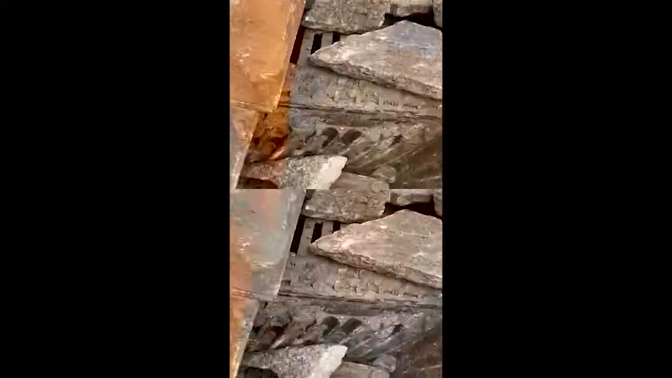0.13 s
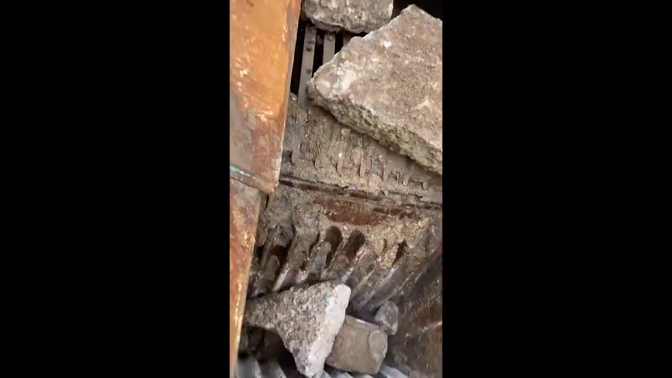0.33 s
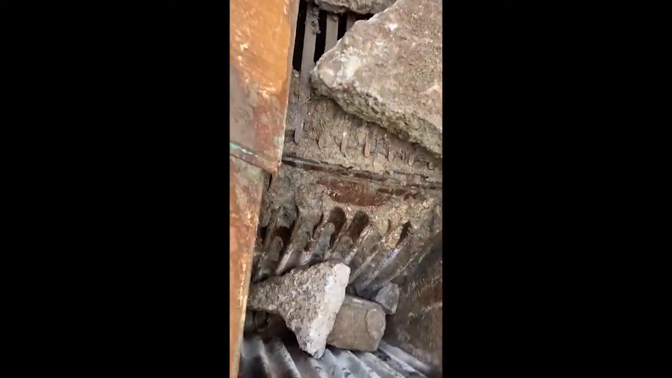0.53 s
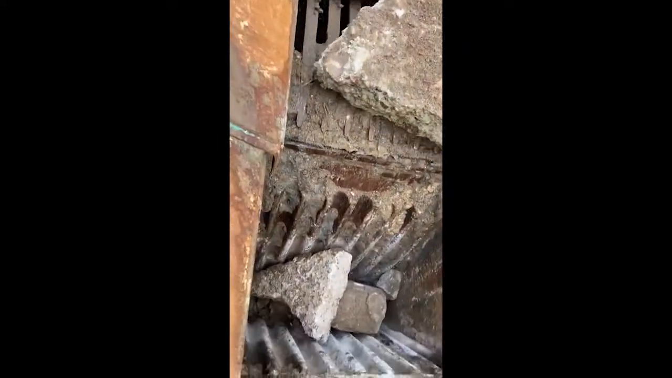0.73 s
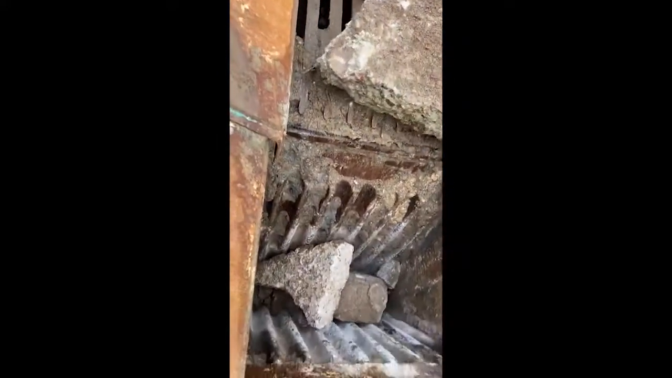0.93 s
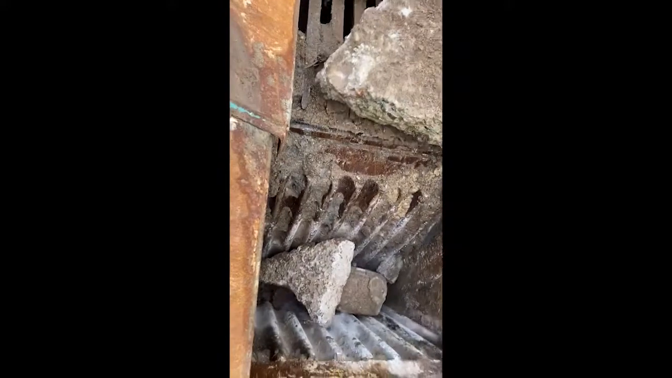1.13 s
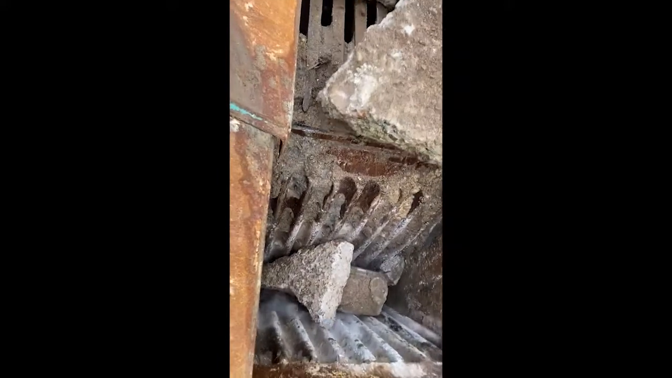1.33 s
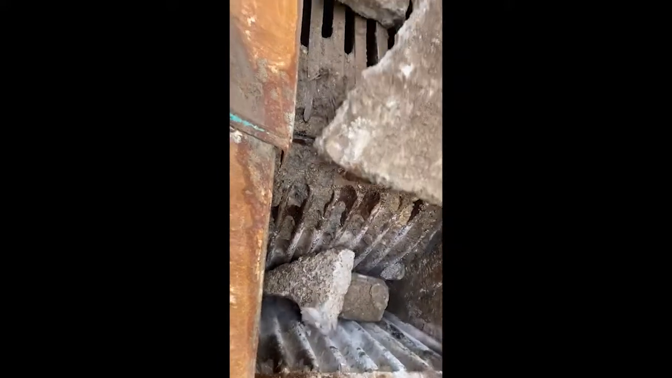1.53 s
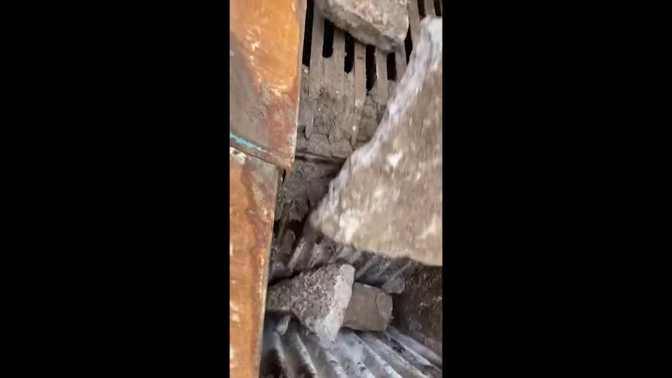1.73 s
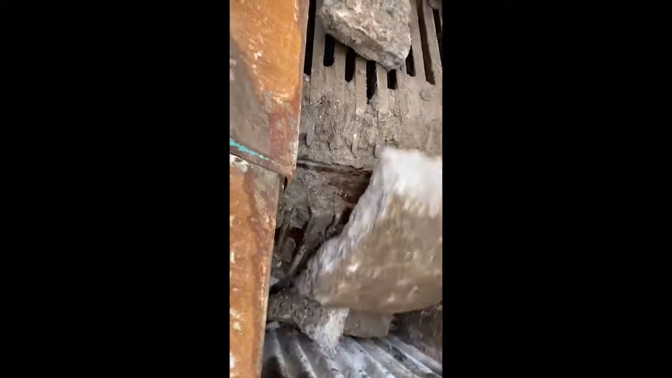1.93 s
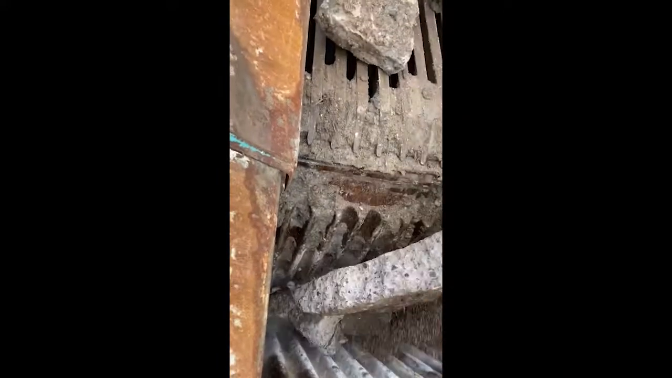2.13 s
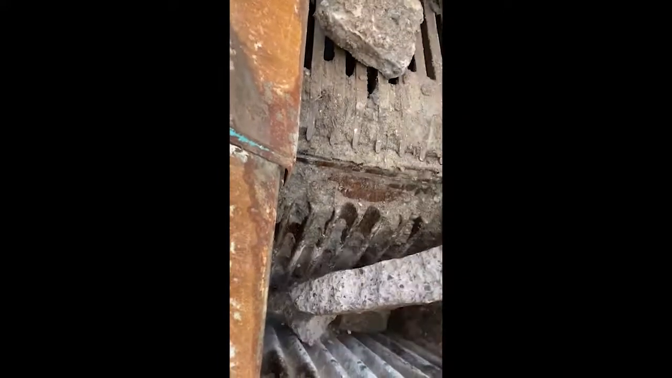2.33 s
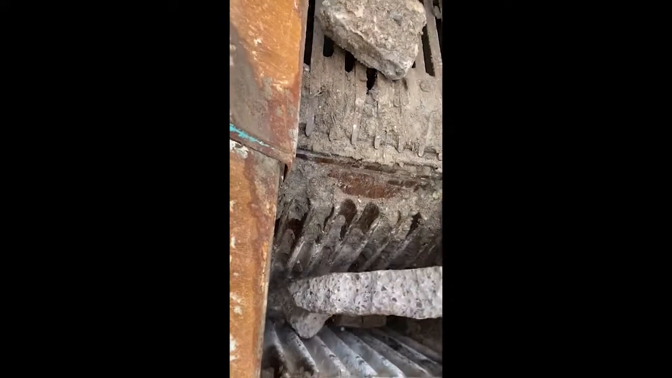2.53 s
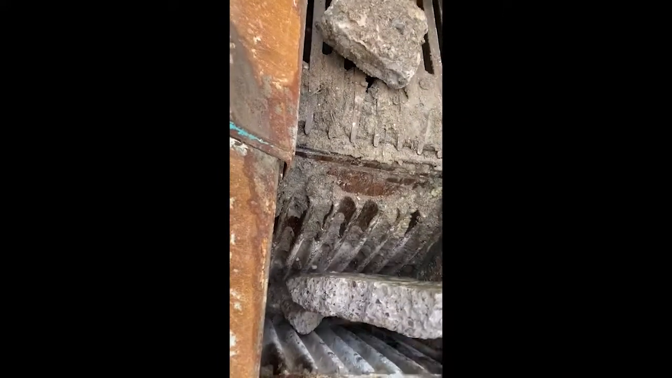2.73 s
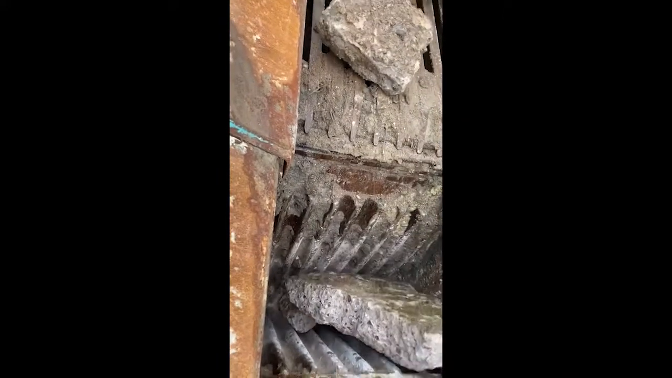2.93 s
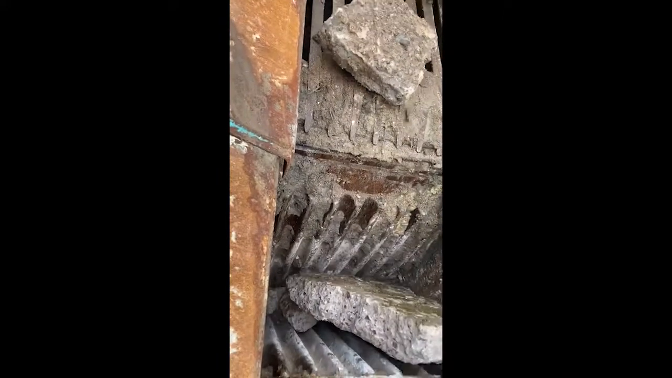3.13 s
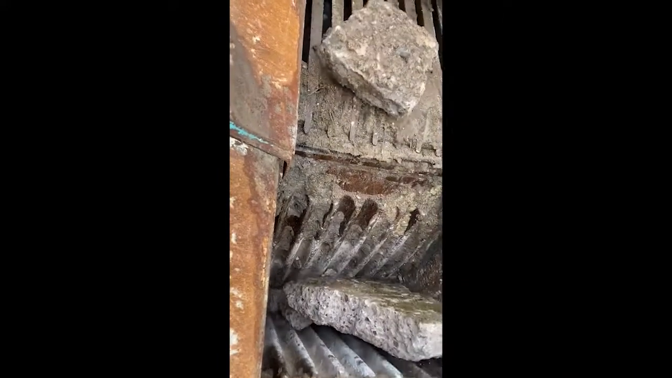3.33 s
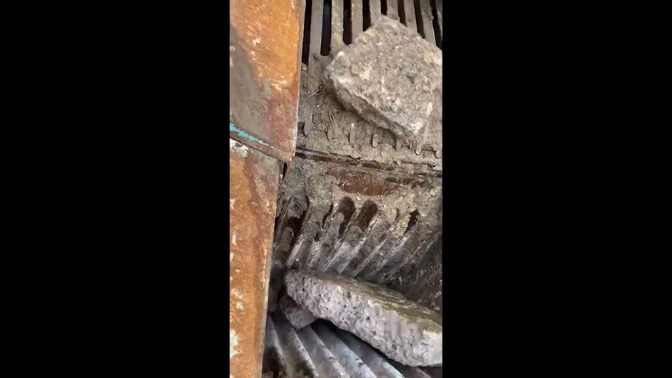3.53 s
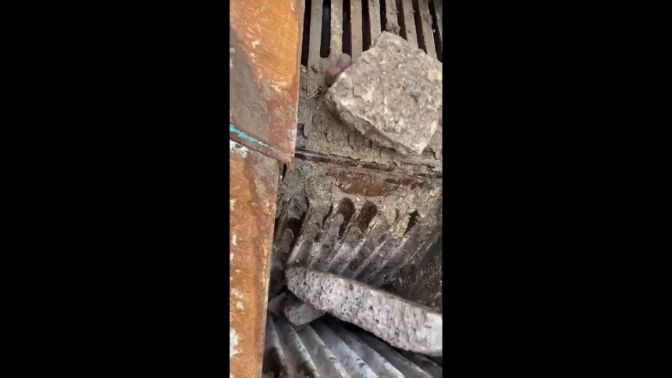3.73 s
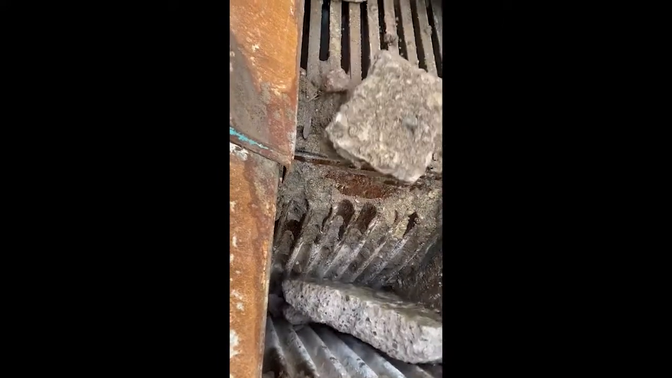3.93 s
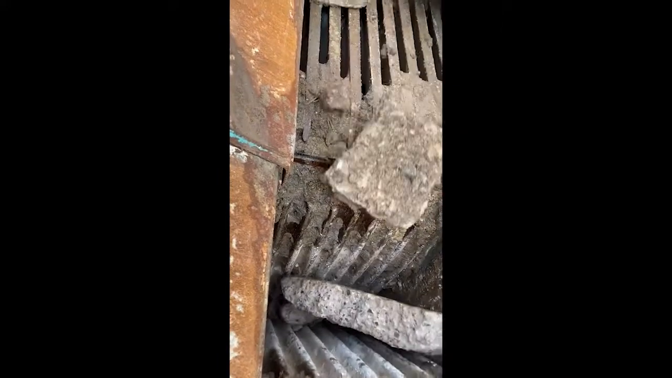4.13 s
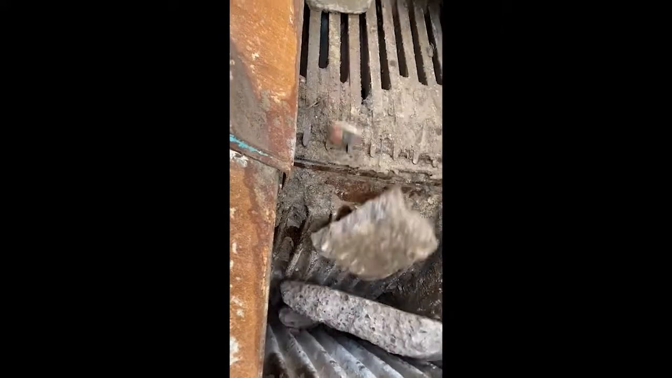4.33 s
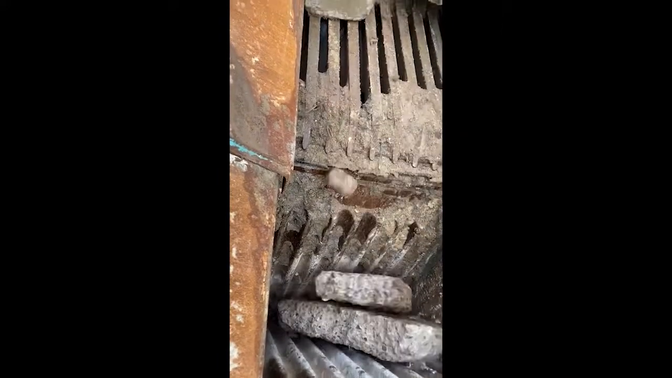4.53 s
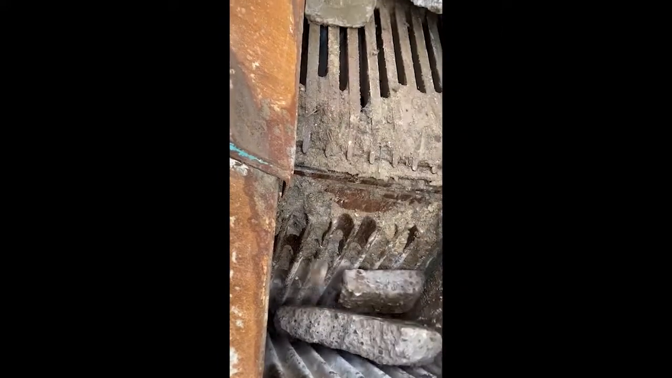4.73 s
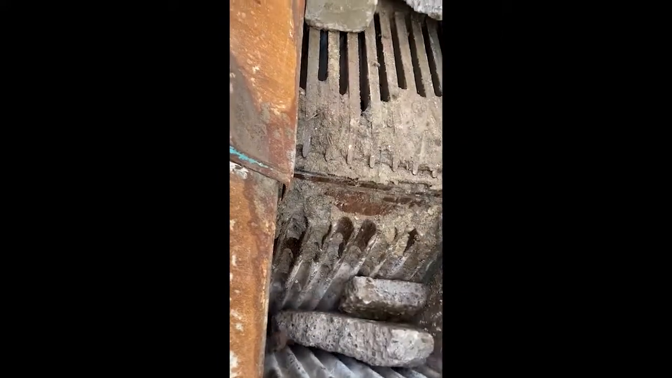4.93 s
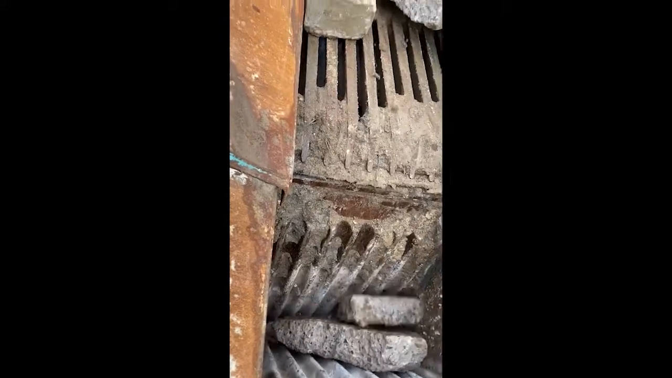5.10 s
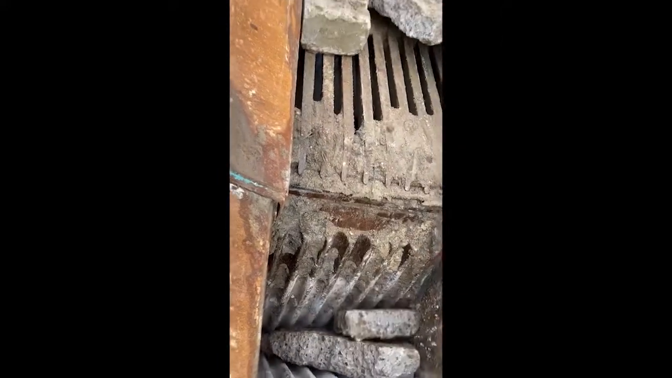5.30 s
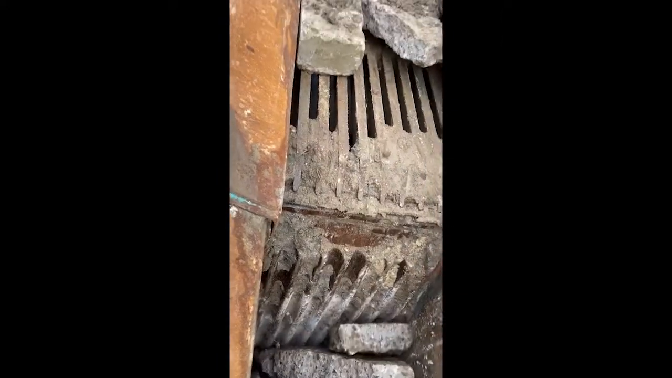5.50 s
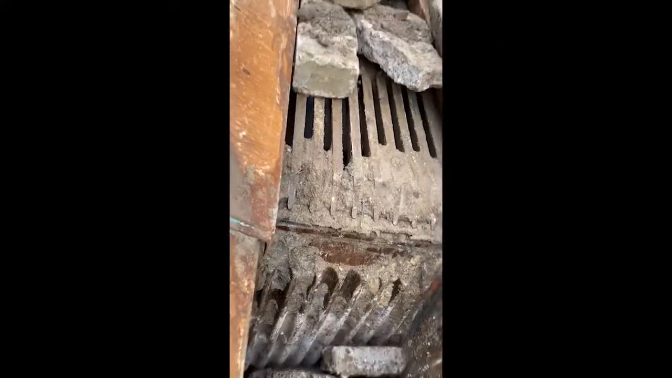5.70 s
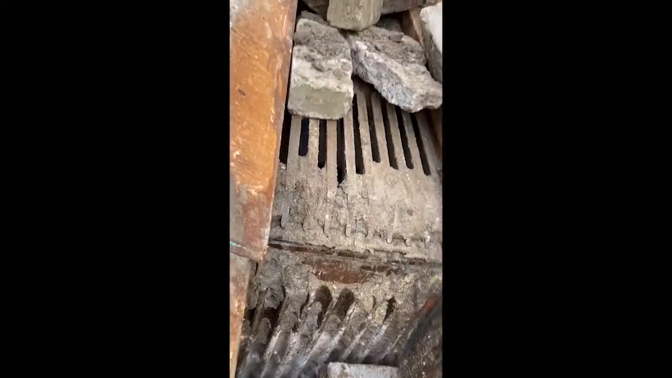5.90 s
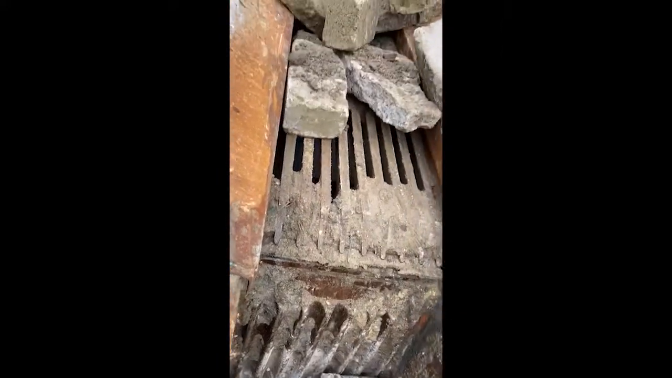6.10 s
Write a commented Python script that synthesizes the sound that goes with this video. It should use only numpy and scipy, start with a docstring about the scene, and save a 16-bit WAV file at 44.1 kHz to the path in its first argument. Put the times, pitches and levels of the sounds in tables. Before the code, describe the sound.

Heard from just above a steel hopper, a jaw crusher hums low and rumbles under load. One dry clack opens, then concrete blocks knock hollowly against jaw and plates in a rapid churn of five to six squeezes a second. Each squeeze crunches, with grit, dust and clinking chips; sharp snaps and short stony rings scatter through. The heaviest knocks gather around four seconds, then it eases briefly and carries on. Close, dry stereo microphone.

```python
"""Just above the steel hopper of a jaw crusher, brick and concrete are chewed 5.5 times a second.
The drive hums on two tones, the loaded frame rumbles as filtered noise and loose rubble shuffles in grains.
One dry clack opens the scene. Then blocks knock as damped resonances that also ring the steel plates.
Each squeeze grinds out a burst of tiny fractures: coarse crunch, grit, dust and clinking chips.
Hard corners ring as short sine pairs, and snapping pieces spray bright grains and ring at their own pitch."""
import sys
import numpy as np
from scipy import signal
from scipy.fft import rfft, irfft, next_fast_len
from scipy.io import wavfile
from scipy.ndimage import uniform_filter1d, minimum_filter1d

SR = 44100
rng = np.random.default_rng(int(sys.argv[2]) if len(sys.argv) > 2 else 0)


def dump_mix(stems):
    """Bounce the given channels to the path in sys.argv[1] as a 16-bit WAV at rate SR."""
    frames = np.atleast_2d(stems).T  # one column per channel
    limited = np.clip(frames, -1, 1)  # hard clip at full scale
    pcm = np.round(limited * 32767).astype(np.int16)
    wavfile.write(sys.argv[1], SR, pcm)


N = 276066
TIME = np.arange(N) / SR   # s

# the jaw swings at a steady rate; times in a stroke are counted from its hardest squeeze
STROKE_S, FIRST_SQUEEZE_S, SQUEEZE_HALF_S = 0.18252, 0.1765, 0.03
STROKE_SPREAD_DB = 1.14   # chance differences in strength between strokes
PITCH_SPREAD_OCTAVES = 0.27
# bands in which coloured noise is scaled to rms 1: (low [Hz], high [Hz])
RUMBLE_BAND, CRUNCH_BAND, GRIT_BAND = (60, 250), (900, 2500), (3000, 7500)


def from_db(db):
    """Turn decibels into an amplitude factor."""
    return 10 ** (np.asarray(db) / 20)


def rms_one(x):
    """Scale a signal to an rms of 1."""
    return x / np.sqrt(np.mean(x ** 2) + 1e-20)


def at_hz(points, hz):
    """Read a table along a log-frequency axis."""
    points = np.array(points)
    return np.interp(np.log(hz + 1), np.log(points[:, 0] + 1), points[:, 1])


def along(curve, s):
    """Read every column of a curve at the times s."""
    times, *columns = np.transpose(curve)
    return [np.interp(s, times, column) for column in columns]


def drift(rate):
    """Slow random motion of rms 1 with about `rate` turns a second."""
    hz = np.arange(N // 2 + 1) * SR / N
    smooth = np.exp(-(2 * hz / rate) ** 2)
    return rms_one(irfft(rfft(rng.standard_normal(N)) * smooth, N))


def coloured(x, spectrum, band):
    """Give two streams a spectrum, scaled to rms 1 inside the band."""
    size = next_fast_len(N + 4096)
    hz = np.arange(size // 2 + 1) * SR / size
    bins = rfft(x, size) * from_db(at_hz(spectrum, hz))
    inside = (hz > band[0]) & (hz < band[1])
    power = 2 * np.mean(np.sum(abs(bins[:, inside]) ** 2, axis=1)) / (size * N)
    return irfft(bins, size)[:, :N] / np.sqrt(power)


def grains(per_s, spread_db):
    """Two streams of tiny fractures: common moments, uneven sizes."""
    born = rng.random(N) < per_s / SR
    size = from_db(spread_db * np.minimum(rng.exponential(1, N), 4))
    return born * size * rng.standard_normal((2, N))


def resonate(x, hz, width_hz):
    """One resonance with gain 1 on its top."""
    r = np.exp(-np.pi * width_hz / SR)
    feed = np.array([1, 0, -1]) * (1 - r * r) / 2
    feedback = [1, -2 * r * np.cos(2 * np.pi * hz / SR), r * r]
    return signal.lfilter(feed, feedback, x + 1e-18)   # the tiny offset keeps the filter fast in silence


def body(x, modes):
    """Resonances side by side, as in a solid object."""
    return sum(from_db(db) * resonate(x, hz, width) for hz, width, db in modes)


def add(out, s, sound):
    """Mix a short sound in at time s."""
    start = max(round(s * SR), 0)
    out[:, start:start + sound.shape[1]] += sound[:, :N - start]


def chips(level_db, per_s, low_hz, high_hz, spread_db=2.0, sharpness=30, count=30):
    """Fragments of many sizes clink briefly, each at its own pitch; small, high ones are fainter."""
    clicks, dealt = grains(per_s, spread_db), rng.integers(0, count, N)
    out = 0
    for k, hz in enumerate(np.geomspace(low_hz, high_hz, count)):
        out = out + resonate(clicks * (dealt == k), hz, hz / sharpness) / hz ** 2
    return from_db(level_db) * rms_one(out)


def squeezes():
    """The moments [s] at which the jaw squeezes hardest."""
    return np.arange(FIRST_SQUEEZE_S, N / SR, STROKE_S)


# load on the machine, relative levels: (time [s], frame rumble [dB], shuffle of loose rubble [dB])
LOAD_CURVE = [(0.0, -24, -42), (0.2, -27.5, -47.5), (0.7, -27, -45), (1.1, -26, -47.5), (1.451, -25, -42.5),
              (1.98, -31, -46.5), (3.12, -28.5, -48), (3.37, -28.5, -40.5), (3.62, -29.5, -47.5),
              (4.05, -29.5, -45), (4.45, -29, -49.5), (4.6, -38.5, -57), (4.84, -34, -52),
              (4.98, -33.5, -46.5), (5.12, -28, -50.5), (5.33, -30, -41.5), (5.6, -31, -45.5),
              (6.25, -31, -48)]
DRIVE_HZ = 49.22


def drive(db, second_db, wander, flutter_db, load_share):
    """The drive hums on its turning rate and the octave, which swells unevenly; both follow the load."""
    frame_db = along(LOAD_CURVE, TIME)[0]
    strain_db = load_share * (frame_db - np.mean(np.array(LOAD_CURVE)[:, 1]))
    phase = 2 * np.pi * np.cumsum(DRIVE_HZ * (1 + wander * drift(5.04))) / SR
    low = from_db(db) * np.sin(phase)
    octave = from_db(second_db + flutter_db * drift(16.0)) * np.sin(2 * phase)
    return from_db(strain_db) * (low + octave)


# spectrum of the frame's rumble: (frequency [Hz], relative level [dB per Hz])
RUMBLE_SPECTRUM = [(25, -28.5), (42, -18), (58, -1), (80, 0), (115, 3), (170, 1.5), (230, -3.5),
                   (380, -5.5), (600, -15), (1100, -53)]
# spectrum of the loose rubble: (frequency [Hz], relative level [dB per Hz])
SHUFFLE_SPECTRUM = [(40, -30.5), (200, -5.5), (450, 13), (800, 6.5), (1200, 0.5), (2000, -7), (3000, -10.5),
                    (5000, -16), (8000, -22), (13000, -28.5), (16000, -36)]


def machine(rumble_db, shuffle_db, jostle_db, slack_db, slack_lead_s):
    """The loaded frame rumbles while loose rubble shuffles on the feeder; both slacken while the jaw is open."""
    frame_db, loose_db = along(LOAD_CURVE, TIME)
    swing = np.cos(2 * np.pi * (TIME - FIRST_SQUEEZE_S + slack_lead_s) / STROKE_S)
    open_db = -slack_db * swing
    rumble = coloured(rng.standard_normal((2, N)), RUMBLE_SPECTRUM, RUMBLE_BAND)
    rumble = from_db(frame_db + open_db + rumble_db) * rumble
    loose = from_db(loose_db + open_db + shuffle_db + jostle_db * drift(60))
    clatter = chips(level_db=-4.5, per_s=90, low_hz=768, high_hz=3890)
    shuffle = coloured(grains(per_s=7600, spread_db=-1.0), SHUFFLE_SPECTRUM, CRUNCH_BAND)
    return rumble + loose * (clatter + shuffle)


# resonances of the single sharp clack: (frequency [Hz], relative level [dB])
CLACK_TONES = [(520, -10.5), (820, -17), (1160, -11), (1700, -15), (2200, -19.5), (2780, -17), (3400, -23),
               (4250, -16), (6200, -25)]
# resonances of the scrape before it: (frequency [Hz], width [Hz], relative level [dB])
SCRAPE_RESONANCES = [(2760, 1240, 5), (5800, 2000, -14)]
# moment of the blow, length of the scrape before it, time after the blow at which the sound breaks off
CLACK_AT_S, SCRAPE_S, CLACK_RING_S = 0.0393, 0.0133, 0.01185


def clack(rise_cycles, steepness, scrape_db, crush_db):
    """A short scrape, then one hard blow: high modes speak first, low ones swell later, and the sound breaks
    off abruptly."""
    t = TIME[:SR // 20] - SCRAPE_S
    noise = rms_one(body(rng.standard_normal((2, len(t))), SCRAPE_RESONANCES))
    sound = from_db(np.where(t < 0, scrape_db, crush_db)) * noise
    for hz, db in CLACK_TONES:
        swell = np.maximum(t, 0) * hz / rise_cycles
        swell = (swell * np.exp(1 - swell)) ** steepness
        sound[0] += from_db(db) * swell * np.sin(2 * np.pi * (hz * t + rng.random()))
    out = np.zeros((2, N))
    stop = np.clip((CLACK_RING_S - t) / .0005, 0, 1)
    add(out, CLACK_AT_S - SCRAPE_S, sound * stop)
    return out


def small_pieces(share, over_db, scatter_s, hz):
    """Some strokes catch a small piece, louder when more rubble is loose: rows of (s, dB, Hz)."""
    s = squeezes()
    late, high = rng.standard_normal((len(s), 2)).T
    caught = rng.random(len(s)) < share
    s = np.clip(s + scatter_s * late, 0, TIME[-1])
    db = along(LOAD_CURVE, s)[1] + over_db
    pitch_hz = hz * 2 ** (PITCH_SPREAD_OCTAVES * high)
    return [tuple(row) for row in np.transpose([s, db, pitch_hz])[caught]]


# how hard the jaw works as the chamber fills and empties, relative levels; bites and strokes both read it:
# (time [s], bite [dB], crunch [dB], grit [dB], delay until the stone gives [s], negative is early)
EFFORT_CURVE = [(0.18, -26.5, -38, -50.5, 0.0066), (0.55, -27.5, -37.5, -52, -0.01),
                (1.3, -26, -37.5, -52, -0.0025), (1.8, -32, -48.5, -53, 0.028),
                (2.2, -34.5, -37, -59, -0.015), (2.55, -34, -37.5, -51.5, -0.015),
                (2.73, -35, -34, -47, 0.0031), (2.92, -25, -41.5, -57.5, -0.011),
                (3.27, -29, -37.5, -55, -0.0079), (3.46, -32, -35.5, -51, 0.015),
                (3.64, -29, -36, -52.5, -0.0047), (3.83, -34, -41, -58, -0.0038),
                (4.1, -23, -35, -52.5, -0.0094), (4.37, -16.5, -38.5, -54, -0.0089),
                (4.56, -26.5, -47, -64, -0.029), (5.1, -27, -38, -56.5, 0.0042),
                (5.3, -25, -41, -50, 0.004), (5.48, -32, -42, -55, 0.019),
                (5.66, -30.5, -39, -49.5, 0.0005), (5.84, -30, -37, -53, 0.0048),
                (6.02, -31, -38.5, -59, -0.011), (6.2, -30, -37, -52, 0.0025)]
# big blocks dropping or slipping against jaw and hopper:
# (time [s], relative level [dB], pitch [Hz], length of contact [s])
BLOCK_KNOCKS = [(0.13, -22, 487, 0.0054), (0.485, -24, 464, 0.0034), (0.672, -18.5, 472, 0.011),
                (0.866, -23.5, 470, 0.006), (0.875, -21, 404, 0.008), (1.061, -16.5, 478, 0.0048),
                (1.18, -26, 432, 0.0035), (1.227, -25, 277, 0.006), (1.245, -21, 375, 0.011),
                (1.274, -17, 500, 0.0046), (1.366, -26.5, 410, 0.013), (1.414, -21, 410, 0.018),
                (1.608, -19.5, 446, 0.0042), (1.68, -25.5, 236, 0.0065), (1.818, -20.5, 476, 0.0048),
                (2.181, -22.5, 439, 0.016), (2.72, -29.5, 330, 0.01), (2.863, -30, 555, 0.006),
                (2.884, -24, 373, 0.0065), (3.057, -21, 423, 0.0085), (3.253, -25, 452, 0.01),
                (3.3, -25, 294, 0.0079), (3.344, -27.5, 428, 0.009), (3.461, -24, 420, 0.017),
                (3.615, -21, 417, 0.0074), (3.917, -27.5, 460, 0.0055), (3.975, -20, 507, 0.0095),
                (4.023, -21, 290, 0.014), (4.168, -18, 445, 0.008), (4.339, -22.5, 559, 0.026),
                (4.521, -23.5, 437, 0.013), (4.541, -17.5, 496, 0.011), (4.74, -25, 380, 0.018),
                (4.884, -24.5, 370, 0.009), (5.07, -24.5, 473, 0.0088), (5.242, -28.5, 589, 0.011),
                (5.294, -27, 304, 0.0063), (5.992, -25.5, 465, 0.007), (6.159, -24.5, 505, 0.007),
                (6.194, -22, 480, 0.011)]
BITE_LEAD_S, BITE_JITTER_S, BITE_HZ, BITE_CONTACT_S = 0.04, 0.00193, 522, 0.013


def bites():
    """A knock as the jaw meets the stone, unless a big block strikes within 0.02 s: (s, dB, Hz, contact s)."""
    s = squeezes()
    early, strong, high = rng.standard_normal((len(s), 3)).T
    db = along(EFFORT_CURVE, s)[0] + STROKE_SPREAD_DB * strong
    pitch_hz = BITE_HZ * 2 ** (PITCH_SPREAD_OCTAVES * high / 2)
    rows = zip(s - BITE_LEAD_S + BITE_JITTER_S * early, db, pitch_hz)
    blocks = np.array(BLOCK_KNOCKS)[:, 0]
    return [(*bite, BITE_CONTACT_S) for bite in rows if np.min(abs(blocks - bite[0])) > .02]


# the frame jolts as the load shifts: (time [s], relative level [dB])
FRAME_JOLTS = [(0.906, -25), (1.289, -19.5), (1.498, -20), (1.54, -22), (1.85, -23.5), (2.034, -17),
               (2.19, -22.5), (2.7, -18.5), (2.754, -19), (3.1, -24), (3.253, -17), (3.846, -21),
               (5.102, -26), (5.477, -25.5), (6.226, -26)]
THUMP_DELAY_S, THUMP_OVER_RUMBLE_DB, THUMP_HZ, THUMP_CONTACT_S = 0.0118, -2, 120, 0.017


def thumps():
    """A low thump of the frame after every squeeze, and the heavy ones: (s, dB, Hz, contact s)."""
    s = squeezes() + THUMP_DELAY_S
    light = list(zip(s, along(LOAD_CURVE, s)[0] + THUMP_OVER_RUMBLE_DB))
    return [(*thump, THUMP_HZ, THUMP_CONTACT_S) for thump in light + FRAME_JOLTS]


# how a struck block rings: (multiple of its pitch, relative level [dB])
BLOCK_TONES = [(1.1, -3.5), (2.05, -8.5), (3.25, -19)]


def strike(hz, ring_s, tick_db, tick_hz, tick_s):
    """The first touch of a block: a hard tick and a short hollow ring; heavy, low blows land more softly."""
    t = TIME[:SR // 12]
    noise = resonate(rng.standard_normal((2, len(t))), tick_hz, tick_hz)
    noise = resonate(noise, tick_hz, 2 * tick_hz)
    tick = from_db(tick_db) * np.exp(-t / tick_s) * rms_one(noise)
    tones = sum(from_db(db) * np.sin(2 * np.pi * ratio * hz * t) for ratio, db in BLOCK_TONES)
    hollow = tones * np.exp(-t / ring_s)
    return (hz / BITE_HZ) ** 2 * (tick + np.outer([1, rng.normal(0, .5)], hollow))


# ring of the steel plates: (frequency [Hz], width [Hz], relative level [dB])
PLATE_RESONANCES = [(296.6, 42, 11.5), (386, 38, 7.5), (445.7, 6.6, -0.5), (549, 18, 2.5), (960, 11, -2)]


def knocks(level_db, rise_s, ring_cycles, relative_width, dull_hz, plate_db, crumble):
    """A block strikes, grinds on steel for a moment, thuds in a broad resonance and rings the plates."""
    out, fronts, t = np.zeros((2, N)), np.zeros((2, N)), TIME[:SR // 8]
    small = small_pieces(share=0.25, over_db=9.9, scatter_s=0.04, hz=410)
    small = [(*piece, BITE_CONTACT_S) for piece in small]
    for s, db, hz, length_s in bites() + thumps() + BLOCK_KNOCKS + small:
        width_hz = relative_width * hz
        thud = resonate(rng.standard_normal((2, 2 * len(t))), hz, width_hz)
        thud = resonate(thud, hz, 2 * width_hz)
        thud = rms_one(thud[:, len(t):])   # skip the part where the resonance builds up
        thud = thud / np.sqrt(1 + crumble * abs(signal.hilbert(thud)) ** 2)   # stone gives way under force peaks
        fade = np.exp(-np.maximum(t - 0.62 * length_s, 0) / (0.0064 + ring_cycles / hz))
        contact = (1 - np.exp(-t / rise_s)) * fade
        thud = contact * thud
        # the blow sets the energy
        thud = thud * np.sqrt(np.sum(contact ** 2) / np.sum(thud ** 2, axis=1, keepdims=True))
        add(out, s, from_db(db + level_db) * thud)
        front = strike(hz, ring_s=0.0091, tick_db=-13, tick_hz=1400, tick_s=0.0043)
        add(fronts, s, from_db(db) * front)
    out = signal.sosfilt(signal.butter(3, dull_hz, fs=SR, output="sos"), out)
    return fronts + out + from_db(plate_db) * body(out, PLATE_RESONANCES)


def squeeze(t, half_s, rise_power=3.8, fall_power=2.5):
    """Crushing starts quickly as the jaw grips and ebbs as it opens."""
    return np.exp(-.5 * abs(t / half_s) ** np.where(t < 0, rise_power, fall_power))


def slips(per_s, depth, decay_s):
    """Stone gives way in jerks: each rises at once and dies fast; a gain of rms 1."""
    jerks = (rng.random(N) < per_s / SR) * rng.uniform(0.38, 1, N)
    power = signal.lfilter([1], [1, -np.exp(-2 / (decay_s * SR))], jerks + 1e-18)
    return rms_one(np.sqrt(1 + abs(depth) * power))


# spectrum of the coarse crunch: (frequency [Hz], relative level [dB per Hz])
CRUNCH_SPECTRUM = [(40, -24), (120, 3), (250, 11), (450, 11.5), (750, 4), (1200, 0.5), (2000, -12.5),
                   (3000, -20.5), (5000, -32), (9000, -32.5)]
# spectrum of the grit: (frequency [Hz], relative level [dB per Hz])
GRIT_SPECTRUM = [(1000, 3.5), (2500, 9), (4000, -10.5), (6000, 6.5), (9000, -10), (13000, -12),
                 (16000, -21)]
# spectrum of the finest dust: (frequency [Hz], relative level [dB per Hz])
DUST_SPECTRUM = [(2000, -12), (4000, 6), (6000, 5.5), (9000, -4.5), (13000, 3.5), (16000, -11)]


def strokes(crunch_db, grit_db, dust_db, crunch_lead_s, slip_db, jerk_depth, jerk_s):
    """Each squeeze crushes stone in small slips: coarse crunch first, grit and fine dust just after."""
    coarse, fine = np.zeros((2, N))
    for s in squeezes():
        _, coarse_db, fine_db, delay_s = along(EFFORT_CURVE, s)
        luck_db = STROKE_SPREAD_DB * rng.standard_normal()
        near = slice(max(int((s - .2) * SR), 0), int((s + .2) * SR))
        t = TIME[near] - s - delay_s
        coarse[near] += from_db(coarse_db + luck_db) * squeeze(t + crunch_lead_s, SQUEEZE_HALF_S)
        fine[near] += from_db(fine_db + luck_db) * squeeze(t, SQUEEZE_HALF_S)
    crunch = coloured(grains(per_s=2500, spread_db=1.5), CRUNCH_SPECTRUM, CRUNCH_BAND)
    crunch = from_db(crunch_db) * slips(70, jerk_depth, jerk_s) * crunch
    grit = coloured(grains(per_s=8000, spread_db=0.0), GRIT_SPECTRUM, GRIT_BAND)
    grit = from_db(grit_db) * slips(68, jerk_depth, jerk_s) * grit
    dust = coloured(grains(per_s=4400, spread_db=1.0), DUST_SPECTRUM, GRIT_BAND)
    dust = from_db(dust_db) * slips(60, jerk_depth, jerk_s) * dust
    fragments = chips(level_db=-1.5, per_s=100, low_hz=699.5, high_hz=3640)
    splinters = chips(level_db=-7.5, per_s=100, low_hz=2370, high_hz=7460)
    crushed = coarse * (crunch + fragments) + fine * (grit + dust + splinters)
    return from_db(slip_db * drift(110)) * crushed


# hard corners of stone striking with a short ring: (time [s], relative level [dB], pitch [Hz])
CORNER_RINGS = [(0.188, -35.5, 1785), (0.323, -36, 1570), (0.545, -30.5, 1593), (0.723, -37, 1400),
                (1.063, -35, 1785), (1.277, -41, 1580), (1.5, -41.5, 1598), (2.04, -35, 2100),
                (2.182, -27, 1204), (2.355, -31.5, 825), (2.517, -32.5, 1190), (2.696, -37, 2060),
                (2.893, -21, 767), (3.063, -18.5, 775), (3.404, -32.5, 864), (3.639, -34, 1190),
                (4.153, -28.5, 1165), (4.158, -25, 766), (4.34, -30, 1040), (4.549, -24.5, 1004),
                (4.698, -22.5, 747), (5.244, -29, 906)]


def rings(level_db, decay_s, overtone_db, overtone_ratio):
    """Each corner excites a close pair of modes and an overtone that dies sooner."""
    out, t = np.zeros((2, N)), TIME[:SR // 6]
    small = small_pieces(share=0.4, over_db=8.2, scatter_s=0.024, hz=973)
    for s, db, hz in CORNER_RINGS + small:
        partner_hz = hz * rng.uniform(.9, .95)
        main = np.sin(2 * np.pi * hz * t) * np.exp(-t / decay_s)
        partner = .5 * np.sin(2 * np.pi * partner_hz * t) * np.exp(-2 * t / decay_s)
        overtone = np.sin(2 * np.pi * overtone_ratio * hz * t) * np.exp(-2 * t / decay_s)
        ring = main + partner + from_db(overtone_db) * overtone
        add(out, s, from_db(db + level_db) * np.outer([1, rng.normal(0, .5)], ring))
    return out


# large pieces snapping: (time [s], relative level [dB], pitch of the piece [Hz])
BIG_SNAPS = [(0.545, -46.5, 3980), (0.965, -52.5, 5560), (0.988, -52, 2920), (1.128, -48.5, 4740),
             (1.498, -47, 4000), (1.83, -44, 2700), (2.039, -39, 5880), (2.163, -45.5, 5960),
             (2.181, -39, 5500), (2.536, -45, 5500), (2.695, -44, 3500), (2.778, -51, 5500),
             (2.799, -50.5, 2450), (3.145, -51.5, 6140), (3.642, -50.5, 3470), (4.155, -49.5, 2380),
             (4.531, -46.5, 3740), (5.298, -48, 3640), (5.652, -43, 2800), (5.673, -48, 5870),
             (5.854, -39.5, 3230), (6.205, -51, 6700)]
# how a snapped piece rings: (multiple of its pitch, relative level [dB])
PIECE_TONES = [(.59, -9), (1, 3), (1.18, -8), (1.88, -1.5)]
# spectrum of the spray of fractures: (frequency [Hz], relative level [dB per Hz])
SNAP_SPECTRUM = [(400, 11.5), (1200, 16.5), (2500, 6.5), (4000, 1), (6000, 2.5), (9000, 0.5), (13000, 0),
                 (16000, -11)]


def cracks(level_db, decay_s, ring_db, sharpness):
    """A snap is a bright, dying spray of fractures that sets the piece ringing at its own pitch."""
    force, ringing, t = np.zeros(N), np.zeros((2, N)), TIME[:SR // 12]
    small = small_pieces(share=0.37, over_db=-10, scatter_s=0.029, hz=4080)
    for s, db, hz in BIG_SNAPS + small:
        force[round(s * SR)] += from_db(db + level_db)
        burst = rng.standard_normal((2, len(t))) * np.exp(-2 * t / decay_s)
        for ratio, mode_db in PIECE_TONES:
            mode = resonate(burst, ratio * hz, ratio * hz / sharpness)
            mode = mode / np.sqrt(np.sum(mode ** 2, axis=1, keepdims=True) / (decay_s * SR / 2))
            add(ringing, s, from_db(db + ring_db + mode_db) * mode)
    spray = signal.lfilter([1], [1, -np.exp(-1 / (decay_s * SR))], force + 1e-18)
    return ringing + spray * coloured(grains(per_s=7000, spread_db=3.5), SNAP_SPECTRUM, GRIT_BAND)


# likeness of the two microphone ports: (frequency [Hz], left-right correlation [0 to 1])
PORT_LIKENESS = [(100, 1), (450, 0.98), (850, 0.61), (1900, 1), (4400, 0.36), (7000, 0.66), (8800, 1),
                 (11000, 1), (13000, 1), (15000, .62)]
# level difference of the ports: (frequency [Hz], left minus right [dB])
PORT_TILT = [(60, -0.5), (200, 2), (400, 3), (700, 4.5), (1290, -0.5), (2400, 0), (4400, -1.5),
             (7500, -0.5)]
# phase difference of the ports: (frequency [Hz], lead of the left [radians])
PORT_LEAD = [(280, 0.02), (450, 0.04), (750, -0.65), (1300, 0.5), (2900, 1.0), (4000, 0.87), (5000, 2.03),
             (6000, 2.52), (10000, 3), (15500, 5)]


def ports(field):
    """Two close ports share the direct sound; hopper reflections reach them differently."""
    size = next_fast_len(N + 4096)
    hz = np.arange(size // 2 + 1) * SR / size
    shared, apart = rfft(field, size)
    alike, sign = np.clip(at_hz(PORT_LIKENESS, hz), 0, 1), np.array([[1], [-1]])
    pair = np.sqrt((1 + alike) / 2) * shared + sign * np.sqrt((1 - alike) / 2) * apart
    pair = pair * from_db(sign * at_hz(PORT_TILT, hz) / 2)
    pair = pair * np.exp(.5j * sign * at_hz(PORT_LEAD, hz))
    return irfft(pair, size)[:, :N]


def scene():
    """Machine, strokes and stone reach the two ports together, over the hum of the drive."""
    hum = drive(db=-40.5, second_db=-37.0, wander=0.01, flutter_db=3, load_share=0.86)
    field = machine(rumble_db=-2.5, shuffle_db=-1.5, jostle_db=2.0, slack_db=1.5, slack_lead_s=0.089)
    field = field + clack(rise_cycles=5.2, steepness=4.5, scrape_db=-33.5, crush_db=-21.5)
    field = field + knocks(level_db=-3.0, rise_s=0.0008, ring_cycles=1.8, relative_width=0.41,
                           dull_hz=1690, plate_db=-3.5, crumble=0.97)
    field = field + strokes(crunch_db=-2.5, grit_db=-1.0, dust_db=1.0, crunch_lead_s=0.0019,
                            slip_db=1.0, jerk_depth=4.8, jerk_s=0.015)
    field = field + rings(level_db=1.5, decay_s=0.01, overtone_db=-20.5, overtone_ratio=1.9)
    field = field + cracks(level_db=0.0, decay_s=0.014, ring_db=-0.5, sharpness=22)
    return ports(field) + hum


def record(dry, ceiling=0.21, release_db_per_s=300, cutoff_hz=15800):
    """A fast limiter holds the peaks down, then a steep low-pass cuts the top."""
    over_db = np.maximum(20 * np.log10(np.max(abs(dry), axis=0) / ceiling + 1e-9), 0)
    # the reduction jumps up at a peak and falls back at the release rate
    held_db = np.maximum.accumulate(over_db + release_db_per_s * TIME) - release_db_per_s * TIME
    gain = uniform_filter1d(minimum_filter1d(from_db(-held_db), size=65), size=65)
    low_pass = signal.ellip(12, .1, 90, cutoff_hz, fs=SR, output="sos")
    return signal.sosfilt(low_pass, dry * gain)


dry = scene()
out = record(dry)
dump_mix(out)
```